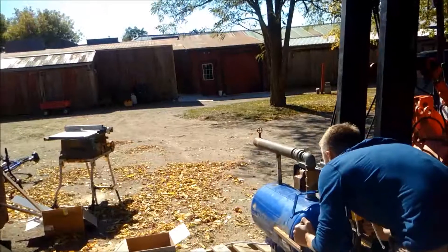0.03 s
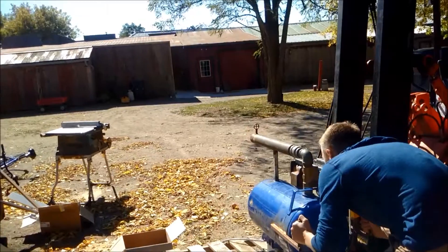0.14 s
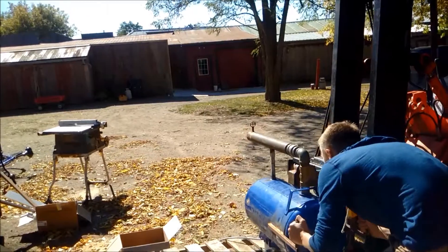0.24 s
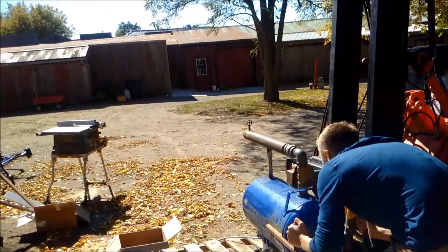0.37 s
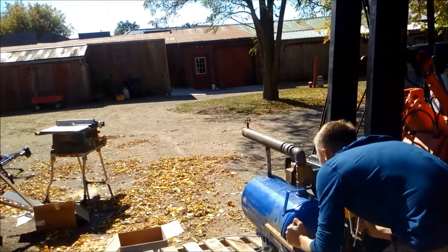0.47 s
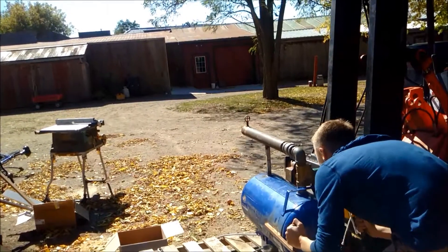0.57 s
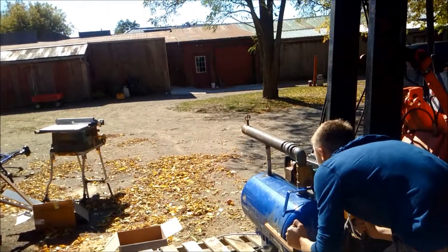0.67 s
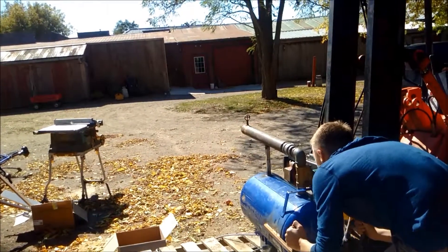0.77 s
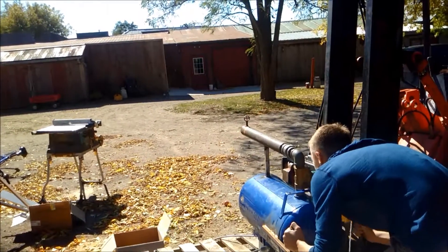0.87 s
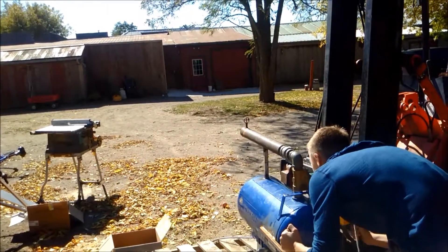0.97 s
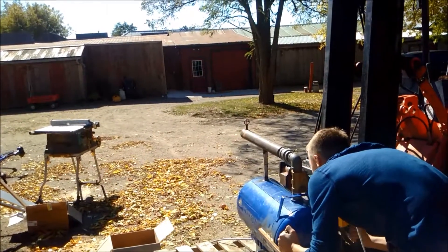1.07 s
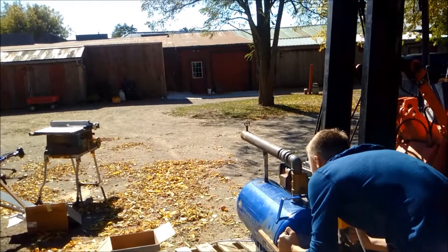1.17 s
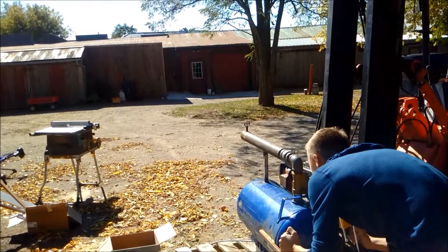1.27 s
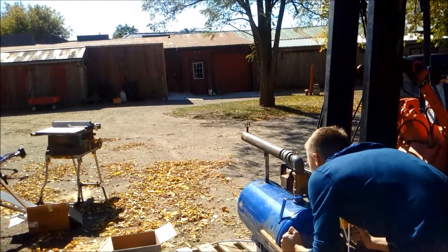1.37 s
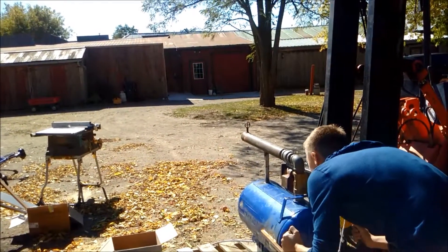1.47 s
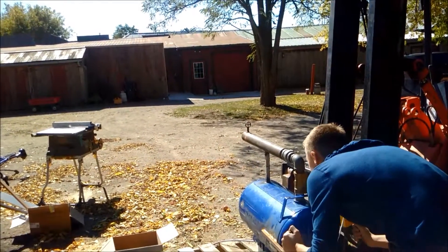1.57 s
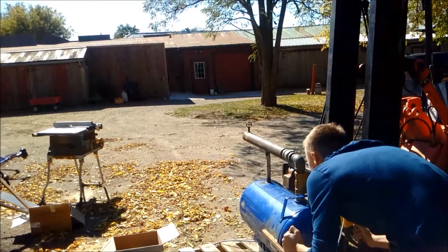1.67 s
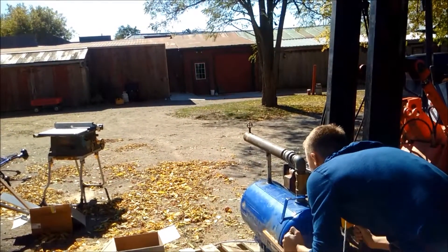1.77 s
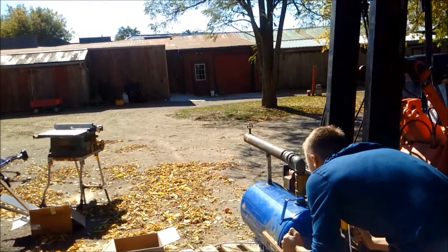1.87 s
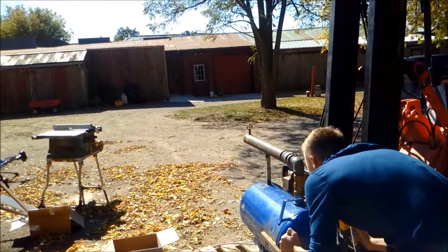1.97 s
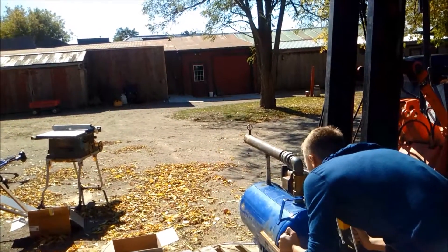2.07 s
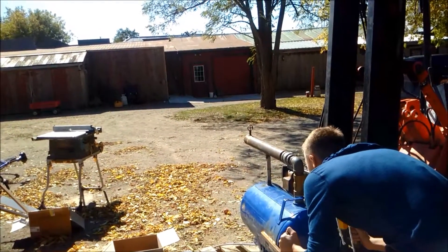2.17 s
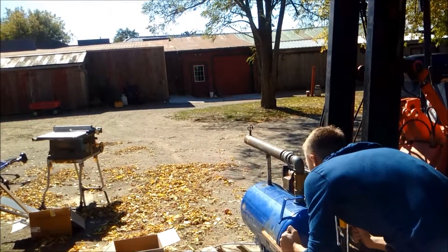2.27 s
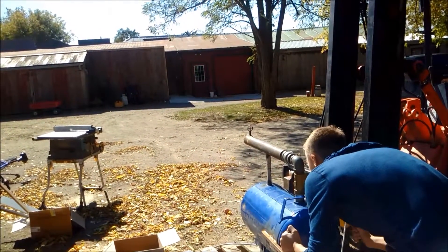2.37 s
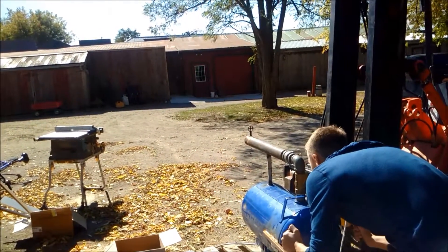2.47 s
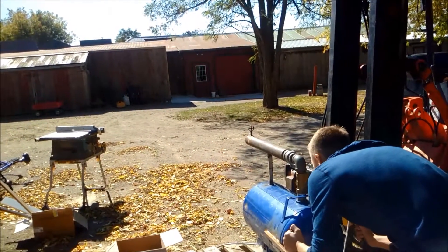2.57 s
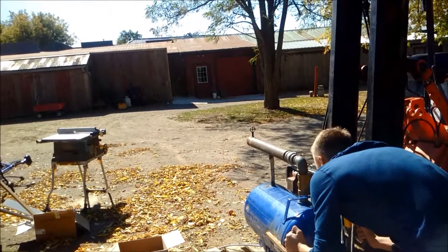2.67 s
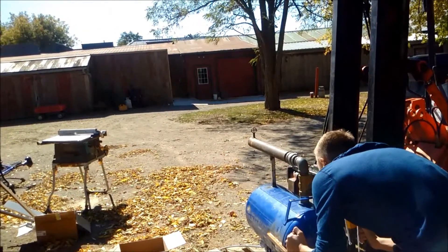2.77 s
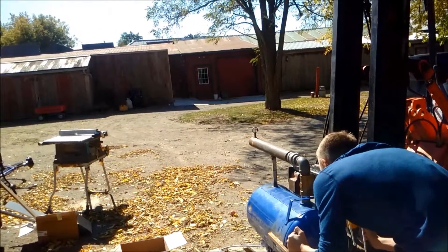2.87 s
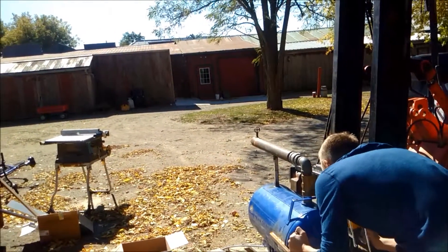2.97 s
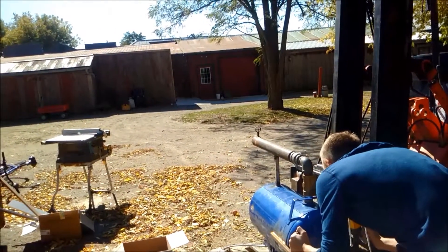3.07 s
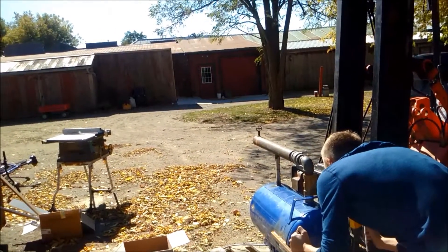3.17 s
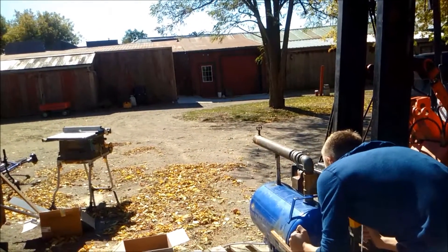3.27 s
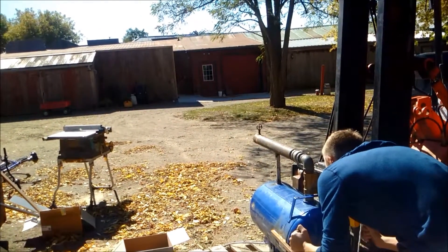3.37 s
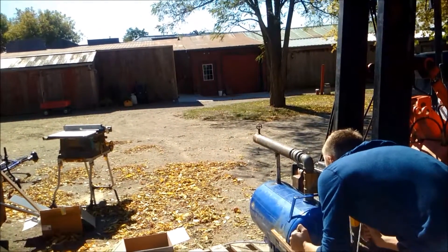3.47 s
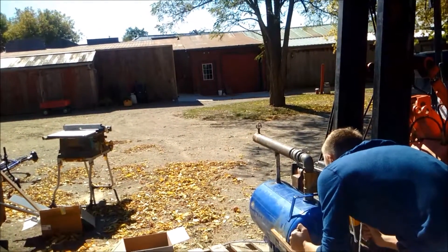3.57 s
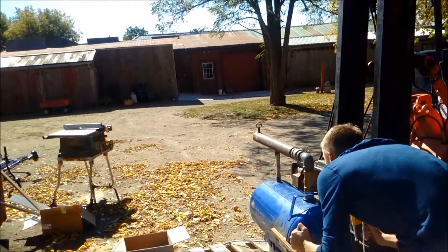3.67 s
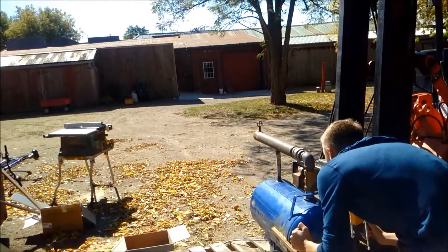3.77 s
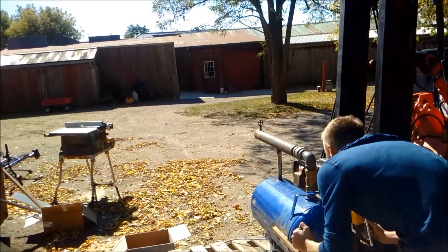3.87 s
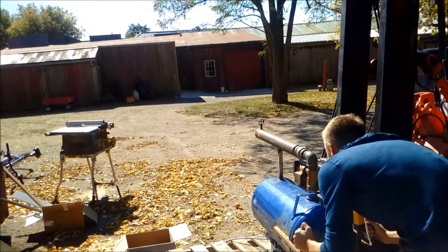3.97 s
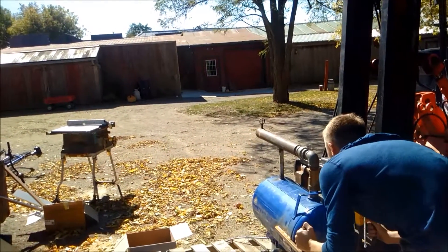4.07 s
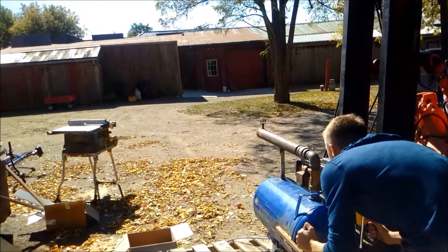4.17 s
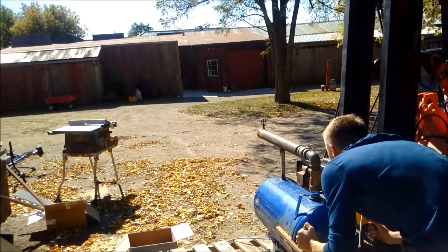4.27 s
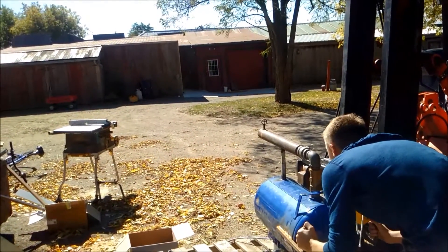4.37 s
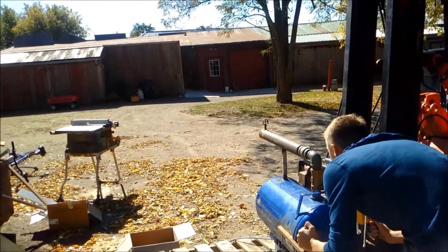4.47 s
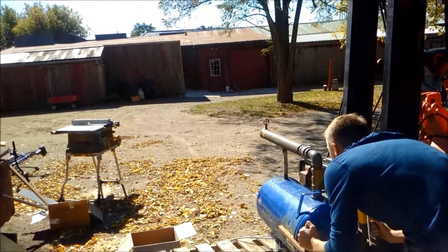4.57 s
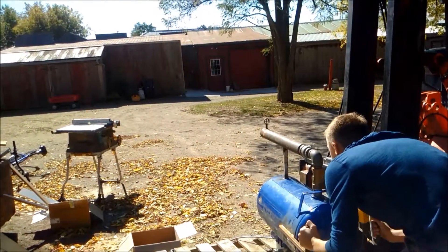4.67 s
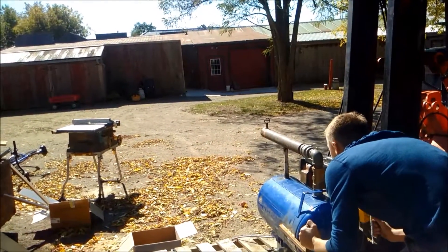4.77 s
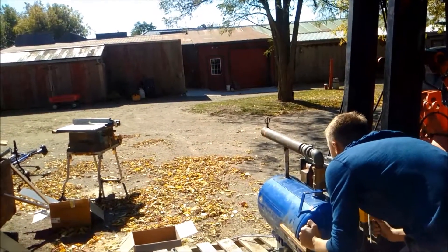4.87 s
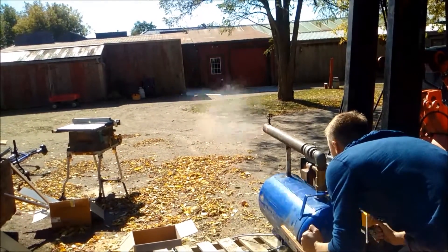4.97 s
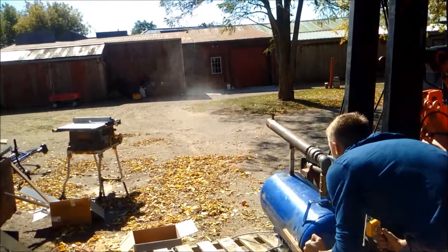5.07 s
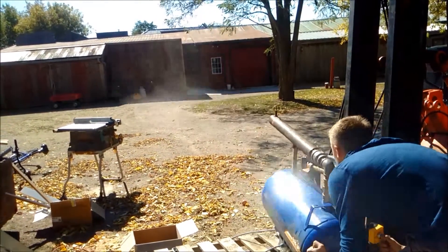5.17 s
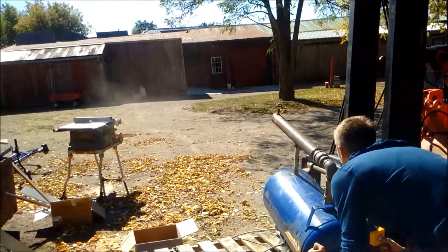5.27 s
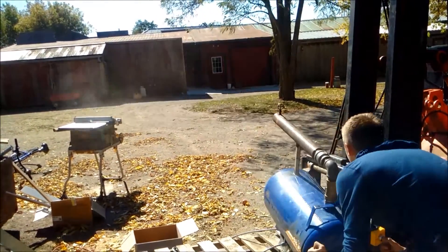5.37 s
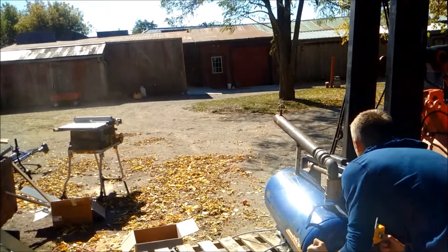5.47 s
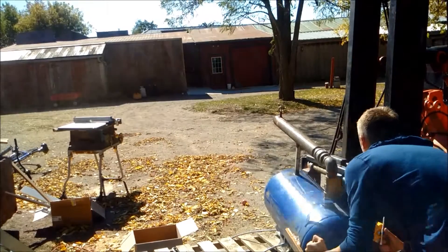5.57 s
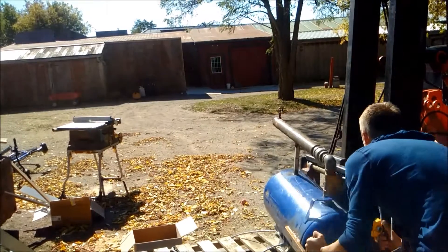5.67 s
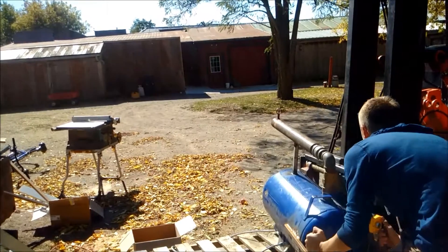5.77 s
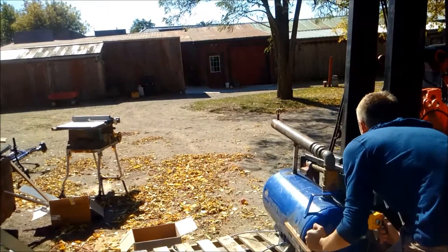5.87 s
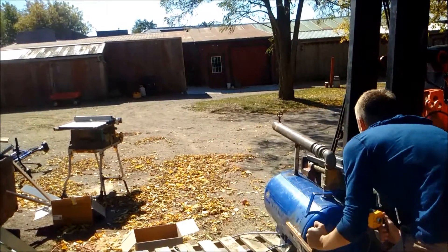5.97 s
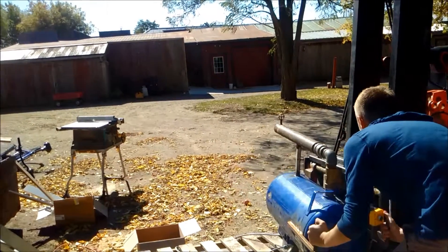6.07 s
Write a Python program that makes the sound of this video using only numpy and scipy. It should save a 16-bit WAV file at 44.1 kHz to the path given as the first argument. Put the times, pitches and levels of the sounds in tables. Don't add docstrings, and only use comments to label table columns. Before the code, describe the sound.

Outdoors between sheds, a piston compressor fades in quickly and drones steadily, with rapid chugging strokes, a high motor whine, casing hum and fan rush. After about five seconds an air launcher fires with a brief hiss, roaring jet and recoil thump. Half a second later a far sheet-metal wall cracks and booms. Sheds echo both bangs, and the microphone's automatic gain dips under each one before the drone returns.

```python
import sys
import numpy as np
from scipy import signal
from scipy.fft import rfft, irfft, next_fast_len
from scipy.io import wavfile
from scipy.ndimage import uniform_filter1d, map_coordinates

SR = 44100
rng = np.random.default_rng(int(sys.argv[2]) if len(sys.argv) > 2 else 0)


def digitize_waveform(pressure):
    field = np.atleast_2d(pressure).T
    bounded = np.clip(field, -1, 1)
    quanta = np.round(bounded * 32767).astype(np.int16)
    wavfile.write(sys.argv[1], SR, quanta)


def boost(x):
    u = np.asarray(x, float) / 20
    return 10 ** u


N = 270774
T_S = np.arange(N) / SR
CRANK_HZ = 23.7204

# freq_hz, left_right_likeness [0-1]
MOTOR_ALIKE = [(60, 0.82), (150, 1), (300, 0.97), (700, 1), (1300, 0.98), (2300, 0.92), (3800, 0.64),
               (5200, 0.7), (7000, 0.68), (10000, 0.51), (11200, 0.72), (13000, 0.75), (14500, 0.99),
               (15300, 0.78)]
# freq_hz, left_right_likeness [0-1]
JET_ALIKE = [(60, 0.81), (240, 0.96), (950, 0.98), (3770, 0.68), (15000, 0.68)]
# freq_hz, level_db [dB per Hz]
YARD = [(500, -5.5), (900, 1), (1300, -6), (2140, 2), (3100, -4.5), (4600, -10), (6800, -15), (10000, -22),
        (15500, -28)]


def unit(x):
    return x / np.sqrt(np.mean(x ** 2) + 1e-20)


def along(points, hz):
    f, v = np.transpose(points)
    return np.interp(np.log(hz + 1), np.log(f + 1), v)


def curves(rows):
    s, *cols = np.transpose(rows)
    return [np.interp(T_S, s, c) for c in cols]


def wobble(rate_hz):
    coarse = np.arange(0, N + 64, 64)
    knots = rng.standard_normal(int(N * rate_hz / SR) + 4)
    return np.interp(np.arange(N), coarse, map_coordinates(knots, [coarse * rate_hz / SR]))


def rush(gain, alike, lead=((1, 0),)):
    m = next_fast_len(N)
    hz = np.fft.rfftfreq(m, 1 / SR)
    turn = np.arccos(np.clip(along(alike, hz), -1, 1)) / 2
    mid, side = rfft(rng.standard_normal((2, m))) * gain(hz) * [np.cos(turn), np.sin(turn)]
    half_lead = np.exp(.5j * along(lead, hz))
    left, right = (mid + side) * half_lead, (mid - side) / half_lead
    return unit(irfft([left, right], m)[:, :N])


def shaped(spectrum):
    return lambda hz: boost(along(spectrum, hz))


def resonant(modes):
    return lambda f: sum(boost(db) / (1 + ((f - c) / w) ** 2) for c, w, db in modes)


def swell(start_s, peak_db, rise_s, hold_s, fall_db_s):
    u = T_S - start_s
    climb_db = 40 * np.clip(1 - u / rise_s, 0, 1)
    fall_db = fall_db_s * np.clip(u - rise_s - hold_s, 0, None)
    return (u > 0) * boost(peak_db - climb_db - fall_db)


def crank():
    # start_s, lag_ms behind a steady crank
    hunting = [(0, -1.6), (.65, -.15), (1.02, -1.25), (1.5, -1.35), (2.15, .42), (2.4, .4), (2.76, -.38),
               (3.1, -.04), (3.6, 0), (4.12, .85), (4.5, 1.08), (4.97, -.5), (5.42, -.72), (5.82, -2.5),
               (6.14, -2.2)]
    first_stroke_s = .01439
    lag_s = uniform_filter1d(curves(hunting)[0], size=5000) / 1000
    return 2 * np.pi * CRANK_HZ * (T_S - first_stroke_s - lag_s)


def pistons(angle):
    # crank_order, level_db [rms]
    strokes = [(2, -41), (4, -36), (6, -39.5), (8, -28), (9, -36.5), (10, -26.5), (12, -40.5), (13, -45),
               (14, -33.5), (16, -43.5), (18, -41), (20, -37), (23, -45.5), (24, -38), (26, -29),
               (27, -37.5), (28, -26), (30, -27), (31, -40), (32, -31), (34, -31.5), (36, -27.5), (37, -45),
               (38, -36.5), (39, -41.5), (40, -39), (44, -44.5), (48, -45.5), (56, -46), (62, -45.5)]
    # freq_hz, every_stroke_ms, once_a_turn_ms
    timing = [(98, -2.5, -5), (155, -1, -6.5), (241, -4.5, -5), (300, -4.5, -4.5), (330.2, 3, -9),
              (417.5, -8, -5), (502.3, -6, -5), (573.3, .5, -8), (958, 1, 2.5), (1173, 5, 3)]
    hz, *late_ms = np.transpose(timing)
    order = np.arange(70)
    late_s = np.array([np.interp(order * CRANK_HZ, hz, ms) / 1000 * (order % 2 == odd)
                       for odd, ms in enumerate(late_ms)])
    shift = 4 * np.pi * CRANK_HZ * np.cumsum(late_s, axis=1)[order % 2, order]
    shift -= 0.68 * (order % 4 == 0) * (order * CRANK_HZ > 600)
    shift += 1.34 * (order % 2)
    turn = np.linspace(0, 2 * np.pi, num=4097)
    parts = np.zeros((3, len(turn)))
    for k, db in strokes:
        part = np.searchsorted([7, 23], k)
        parts[part] += boost(db + 3) * np.sin(k * turn - shift[int(k)])
    thump, pipe, knock = [np.interp(angle % (2 * np.pi), turn, p) for p in parts]
    pipe_gain = boost(-0.2 + 0.27 * wobble(30))
    knock_gain = boost(0.07 + 0.52 * wobble(40))
    return boost(0.34) * thump + pipe_gain * pipe + knock_gain * knock


def whine(angle):
    # mains_sideband, level_db [rms]
    sidebands = [(-3, -40.5), (-1.5, -38.5), (-1, -28.5), (0, -29), (1, -31.5)]
    # crank_order, level_db [rms]
    gear = [(90, -39.5), (214, -56), (216, -57), (288, -54)]
    mains_hz = 120
    mains = 2 * np.pi * mains_hz * T_S + 1.04
    lead_rad = np.array([[.4], [-.4]])
    slot = 108 * angle + lead_rad + .5 * wobble(40)
    slots = 0
    for k, db in sidebands:
        gain = boost(db + 3.5 + 1.1 * wobble(12) + 0.27 * wobble(1.5))
        slots = slots + gain * np.sin(slot + k * mains + 1.3 * abs(k))
    teeth = 0
    for k, db in gear:
        gain = boost(db + 6 + 3.7 * wobble(8))
        teeth = teeth + gain * np.sin(k * angle + 0.47 * wobble(10) + lead_rad)
    stroke_swing = 1 + 0.17 * np.cos(2 * angle + .6)
    return (slots * stroke_swing + teeth) * boost([[.6], [-.6]])


def casing_hum(angle):
    # freq_hz, level_db [dB per Hz]
    hum = [(25, -28), (45, -11), (90, -10.5), (150, -9.5), (200, -13.5), (270, -6.5), (450, -5.5),
           (520, -13.5), (660, -3.5), (900, -2.5), (1100, -14), (1350, -11), (1650, -18), (2400, -120)]
    return boost(-28 + 0.8 * np.cos(2 * angle - .2)) * rush(shaped(hum), MOTOR_ALIKE)


def fan(angle):
    # freq_hz, level_db [dB per Hz]
    spectrum = [(1200, -47), (1600, -9.5), (1950, 2), (2350, 0), (2900, -5), (3800, -6), (4500, -13.5),
                (5100, -8), (6000, -14.5), (6900, -11), (8200, -17), (11000, -20), (14500, -18.5),
                (15400, -10.5)]
    # freq_hz, left_lead_rad
    lead = [(1800, 0), (2100, .8), (2700, .7), (3300, -.4), (3950, -1.1), (4400, .6), (5250, 2), (7200, .9),
            (8100, 1.4), (8900, 2.6), (10200, 2.5), (11000, 3.1), (16000, 3.1)]
    level_db = -23.0 + 0.1 * np.cos(2 * angle) + 0.4 * wobble(6) + 0.67 * wobble(60)
    return boost(level_db) * rush(shaped(spectrum), MOTOR_ALIKE, lead)


def compressor():
    angle = crank()
    strokes = boost([[.2], [-.2]]) * pistons(angle)
    air = boost([[.3], [-.3]]) * fan(angle)
    return strokes + whine(angle) + casing_hum(angle) + air


def valve():
    # freq_hz, width_hz, level_db
    slit = [(4480, 500, 3.5), (6500, 900, -6), (9500, 990, -15)]
    gain = swell(start_s=5.047, peak_db=-15, rise_s=.001, hold_s=.024, fall_db_s=600)
    return gain * rush(resonant(slit), JET_ALIKE)


def jet():
    # start_s, level_db
    flow = [
        (5.046, -63),
        (5.048, -20),
        (5.074, -14.5),
        (5.115, .5),
        (5.15, 4),
        (5.194, 3.5),
        (5.199, -7),
        (5.235, -25),
        (5.3, -70),
    ]
    # freq_hz, level_db [dB per Hz]
    hiss_spectrum = [(900, -27), (1500, -8.5), (2300, 1), (3300, -6.5), (4200, -3), (6500, -5.5),
                     (8500, -13), (12500, -18), (15000, -12.5)]
    # freq_hz, width_hz, level_db
    barrel = [(2334, 53, -5), (2130, 72, -6.5)]
    # freq_hz, width_hz, level_db
    breech = [(90, 50, -13), (261, 60, -8), (686, 41, -3), (940, 130, 3), (1400, 690, -8)]
    flow_db, = curves(flow)
    whistle_db = flow_db - 2 - 3 * np.clip(-14.5 - flow_db, 0, None)
    roar_lead_s, roar_top_db = 0.008, -3
    roar_db = np.minimum(-5.5 + 1.5 * np.interp(T_S + roar_lead_s, T_S, flow_db), roar_top_db)
    hiss = boost(flow_db + 1.4 * wobble(150)) * rush(shaped(hiss_spectrum), JET_ALIKE)
    whistle = boost(whistle_db + 1.6 * wobble(80)) * rush(resonant(barrel), JET_ALIKE)
    roar = boost(roar_db) * rush(resonant(breech), JET_ALIKE)
    return hiss + whistle + roar


def tank():
    # pitch_hz, peak_db, hold_s, fall_db_s, waver_rad
    tank_modes = [(101, -15, .05, 38, .2), (269, -11.5, .02, 135, .6)]
    modes = 0
    for hz, db, hold_s, fall_db_s, waver_rad in tank_modes:
        gain = swell(5.19, db, 0.041, hold_s, fall_db_s)
        modes = modes + gain * np.sin(2 * np.pi * hz * T_S + waver_rad * wobble(20))
    damped_s, damping_db_s = 5.46, 120
    return modes * boost(-damping_db_s * np.clip(T_S - damped_s, 0, None))


def knocks(events, modes, crack_t60_s):
    out = np.zeros((2, N + SR))
    t = np.arange(SR // 4) / SR
    dull = signal.butter(3, 4200, fs=SR)
    for start_s, db, crack_db in events:
        ring = sum(boost(level_db + rng.normal(0, 2.3) - 60 * t / t60_s) * np.sin(-2 * np.pi * hz * t)
                   for hz, level_db, t60_s in modes)
        noise = rng.standard_normal(len(t)) + .5 * rng.standard_normal((2, len(t)))
        crack = boost(crack_db - 60 * t / crack_t60_s) * 2 * signal.lfilter(*dull, noise)
        attack = 1 - np.exp(-t / 0.00088)
        out[:, round(start_s * SR):][:, :len(t)] += boost(db - 9.0) * (ring + crack) * attack
    return out[:, :N]


def recoil():
    # start_s, peak_db, crack_db
    kick = [
        (5.097, 10.5, -1),
    ]
    # pitch_hz, level_db, t60_s
    frame = [(300, 2, .08), (646, 0, 0.082), (100, -16, .2)]
    return knocks(kick, frame, crack_t60_s=0.048)


def wall_hit():
    # start_s, peak_db, crack_db
    hits = [
        (5.5262, 3.5, -3),
        (5.5315, 2, -6),
        (5.541, 1, -2),
        (5.646, -12, -14),
    ]
    # pitch_hz, level_db, t60_s
    wall = [(211, -3.5, 0.081), (250, -1, 0.18), (725, -4, 0.06), (2080, -10, .04), (3540, -18, 0.031)]
    return knocks(hits, wall, crack_t60_s=0.069)


def boom():
    # start_s, pitch_hz, peak_db, hold_s, fall_db_s
    panels = [
        (5.536, 214, -7, .046, 500),
        (5.584, 246.6, -4.5, .006, 500),
        (5.628, 238, -17, .006, 300),
        (5.665, 187.3, -21, .05, 150),
    ]
    # freq_hz, width_hz, level_db
    sheets = [(191, 36, 4.5), (300, 33, -3), (430, 54, -9)]
    rattle = boost(-8) * rush(resonant(sheets), JET_ALIKE)
    out = 0
    for start_s, hz, db, hold_s, fall_db_s in panels:
        tone = np.sin(2 * np.pi * hz * (T_S - start_s))
        out = out + swell(start_s, db + 2.0, 0.024, hold_s, fall_db_s) * (tone + rattle)
    return out


def echoes():
    far_hz = 4200
    near = rush(shaped(YARD), JET_ALIKE)
    far = boost(-1) * rush(lambda hz: shaped(YARD)(hz) / (1 + (hz / far_hz) ** 2), JET_ALIKE)
    jet_gain = swell(start_s=5.12, peak_db=-10, rise_s=.08, hold_s=.03, fall_db_s=95)
    hit_gain = swell(start_s=5.524, peak_db=-7.5, rise_s=.006, hold_s=.068, fall_db_s=220)
    return boost(0.92 * wobble(120)) * (jet_gain * near + hit_gain * far)


def scene():
    shot = valve() + jet() + tank() + recoil()
    hit = wall_hit() + boom()
    return compressor() + shot + hit + echoes()


def camera_gain():
    # start_s, depth_db, grab_s, let_go_s, release_s
    ducks = [
        (5.078, 26, .045, 5.243, .075),
        (5.529, 15, .012, 5.618, .024),
    ]
    fade_s, fade_db, creep_db_s = 0.76, -28, 56
    gain = boost(fade_db * np.clip(1 - T_S / fade_s, 0, 1))
    for start_s, depth_db, grab_s, free_s, release_s in ducks:
        u = np.clip(T_S, start_s, free_s) - start_s
        held = boost(-np.clip(depth_db * (1 - np.exp(-u / grab_s)) - creep_db_s * u, 0, None))
        gain = gain * (held + (1 - held) * np.clip((T_S - free_s) / release_s, 0, 1))
    return gain


def roll_off(x):
    return signal.sosfilt(signal.butter(12, 17000, fs=SR, output="sos"), x)


def record(dry):
    low_hz, top_hz, clip_level = 40, 15750, 0.8
    low_cut = signal.butter(2, low_hz, "high", fs=SR, output="sos")
    x = signal.sosfilt(low_cut, dry) * camera_gain()
    x = x / (1 + np.abs(x / clip_level) ** 6) ** (1 / 6)
    x = irfft(rfft(x) * (np.fft.rfftfreq(N, 1 / SR) < top_hz), N)
    return roll_off(x)


dry = scene()
out = record(dry)
digitize_waveform(out)
```